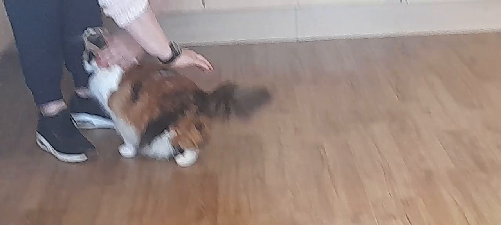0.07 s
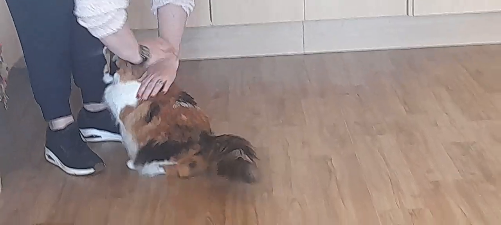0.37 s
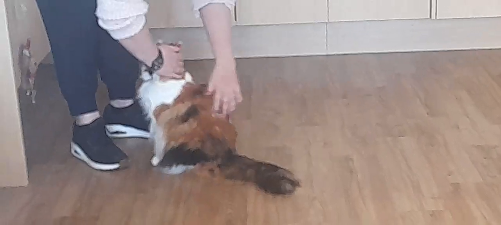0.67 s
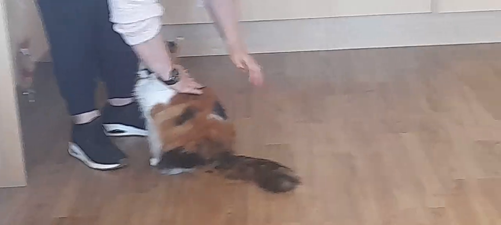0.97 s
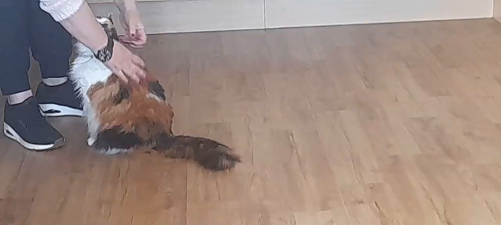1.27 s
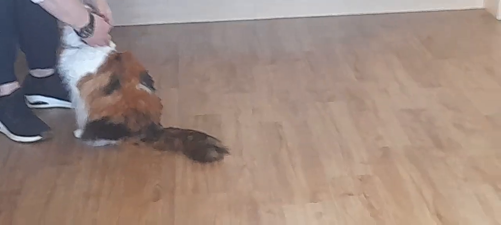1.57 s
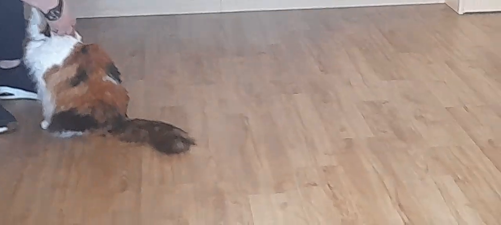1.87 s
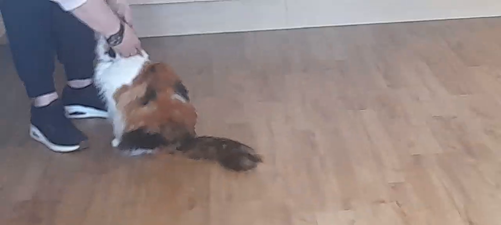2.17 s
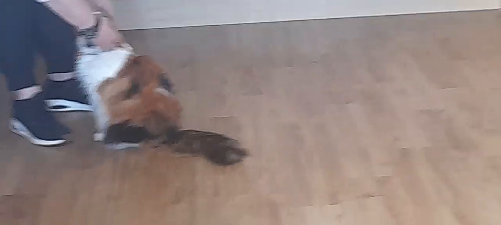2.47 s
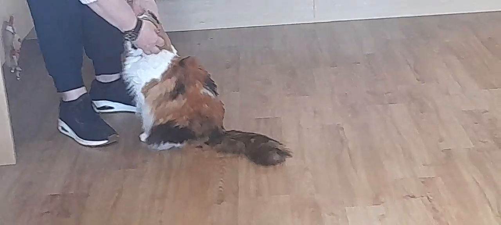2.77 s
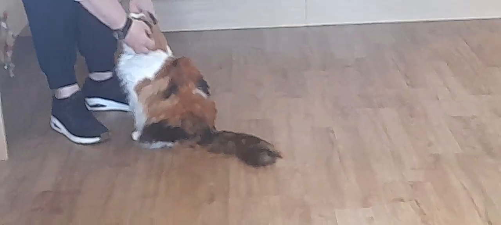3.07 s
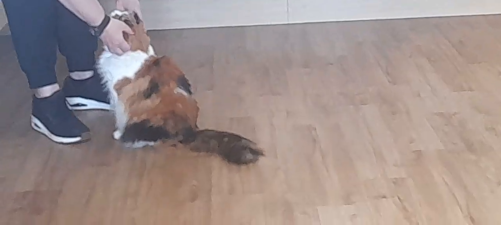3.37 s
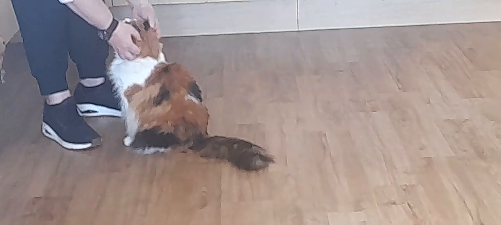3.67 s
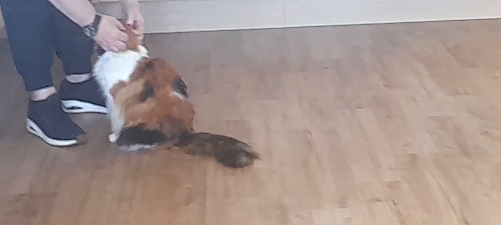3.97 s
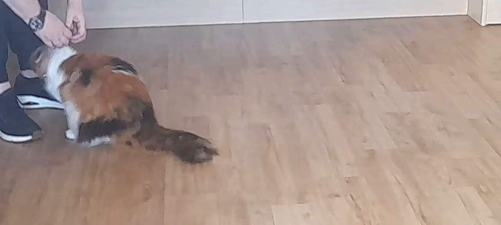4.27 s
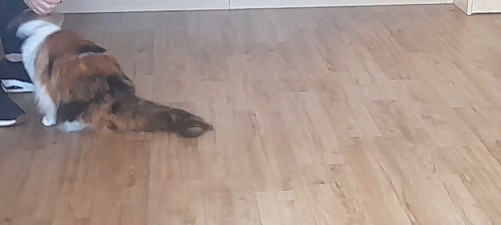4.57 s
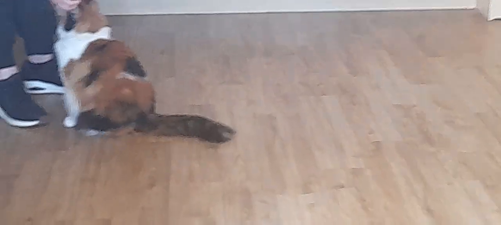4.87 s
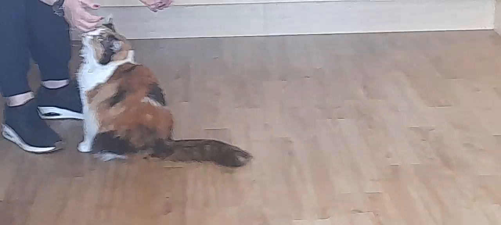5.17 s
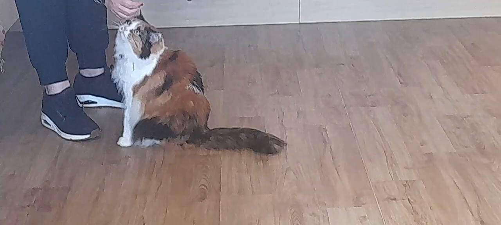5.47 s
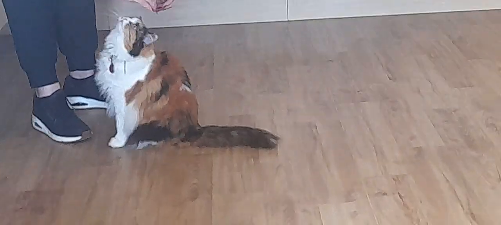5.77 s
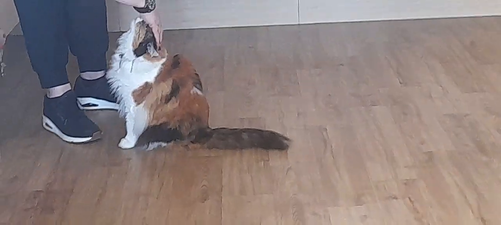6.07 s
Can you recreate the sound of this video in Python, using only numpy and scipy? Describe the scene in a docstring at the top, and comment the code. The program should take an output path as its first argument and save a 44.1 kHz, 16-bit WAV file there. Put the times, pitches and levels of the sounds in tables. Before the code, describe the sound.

A hand-held phone picks up the soft, steady hum and fan noise of a kitchen appliance. After one small tick, a low drone rises and dies away. Past the middle, a cat's collar bell and metal tag give a short, bright jingle and rattle a couple of metres off, with a soft brush of fur and light ticks. The jingle echoes slightly in the bare room, and the appliance carries on alone.

```python
"""An appliance hums and its fan whirs throughout, heard by a hand-held phone in a wooden-floored kitchen.
Near 2 s a dry tick sounds and a low drone swells, to die away by 4 s. Then a cat, being petted about
two metres off, ducks its head once: its fur rustles, the little bell, metal tag and split ring on its
collar jingle and the fittings rattle, with a few more ticks. The bare room rings after the collar,
and from just past 5 s the appliance is left alone."""
import sys
import numpy as np
from scipy import signal
from scipy.fft import rfft, irfft
from scipy.io import wavfile
from scipy.ndimage import uniform_filter1d

SR = 44100
rng = np.random.default_rng(int(sys.argv[2]) if len(sys.argv) > 2 else 0)


def to_wav(s):
    """Save 16-bit WAV."""
    ch = np.atleast_2d(s).T  # columns
    pcm = np.round(np.clip(ch, -1, 1) * 32767)  # PCM
    wavfile.write(sys.argv[1], SR, pcm.astype(np.int16))


N = 270333
TIME = np.arange(N) / SR
FREQ = np.maximum(np.fft.rfftfreq(N, 1 / SR), 1)


def undb(db):
    """Decibels to gain."""
    return 10 ** (np.asarray(db) / 20)


def unit(x):
    """Scale to an rms of 1."""
    return x / np.sqrt(np.mean(x ** 2))


def fader(rows):
    """Gain over time from rows of seconds and dB."""
    return undb(np.interp(TIME, *np.transpose(rows)))


def spectrum(rows, column=1):
    """One column of a table, drawn as a curve over log frequency."""
    rows = np.array(rows)
    return np.interp(np.log(FREQ), np.log(rows[:, 0]), rows[:, column])


def resonance(hz, width):
    """A peak of height 1 over frequency."""
    return 1 / (1 + (2 * (FREQ - hz) / width) ** 2)


def pan(db):
    """Stereo gains for a level difference; positive is to the left."""
    return undb(np.array([[.5], [-.5]]) * db)


def eq(x, gain):
    """Filter by a gain at each frequency."""
    return irfft(rfft(x) * gain, N)


def drift(rate_hz):
    """Smooth random movement, rms 1."""
    hold = int(SR / rate_hz)
    steps = np.repeat(rng.standard_normal(N // hold + 1), hold)
    return unit(uniform_filter1d(uniform_filter1d(steps, hold), hold)[:N])


def stereo_noise(gain, correlation):
    """Coloured noise of rms 1; the lower the correlation, the wider the image."""
    mid, side = rng.standard_normal((2, N))
    mid = eq(mid, gain * np.sqrt(1 + correlation))
    side = eq(side, gain * np.sqrt(1 - correlation))
    return unit(np.array([mid + side, mid - side]))


def add(out, start_s, sound):
    """Mix a sound in at its start time."""
    i = int(start_s * SR)
    out[..., i:i + sound.shape[-1]] += sound[..., :N - i]


def standing_waves(spacing_hz=14):
    """The room lifts some frequencies and hollows out others, less so below 500 Hz."""
    grid_hz = np.arange(0, SR / 2, spacing_hz)
    return np.interp(FREQ, grid_hz, rng.standard_normal(len(grid_hz))) * np.minimum(FREQ / 500, 1)


# Level ride of the fan's air. Each row: time in seconds, relative level in dB.
AIR_RIDE = [(0, -56.5), (1.2, -57), (2.0, -55), (2.7, -56), (3.5, -56), (4.5, -54.5), (5.4, -56),
            (6.13, -55.5)]
# Tone of the rushing air. Each row: frequency in Hz, gain in dB.
AIR_EQ = [(20, -20), (60, -5.5), (140, 1.5), (235, -2.5), (350, 3), (560, -1.5), (850, -10), (1500, -4.5),
          (2100, -9), (2900, -19.5), (5000, -23.5), (6500, -25), (8500, -42.5), (16000, -50)]
# Resonances of the fan housing. Each row: centre in Hz, width in Hz, boost in dB.
HOUSING_PEAKS = [(393, 15, 5.7), (1048, 124, 11.3), (1200, 13, 1.3), (1464, 163, 5.4), (1856, 120, 6.6)]
# Stereo image of the air. Each row: frequency in Hz, left-right correlation.
AIR_IMAGE = [(30, 0.66), (80, 0.59), (300, 0.39), (600, 0.43), (1200, 0.2), (2500, 0.43), (8000, 0.21)]
# Tone of the thin hiss. Each row: frequency in Hz, gain in dB.
HISS_EQ = [(2000, -7), (6000, -5), (8000, -0.5), (10000, 0), (11500, 4.5), (12300, 3), (13000, 8),
           (16000, -2.5)]


def fan(air_db=4.5, hiss_db=-75, ripple_db=2.5, flutter_db=.5):
    """Air rushes through the resonant housing, over a thin even hiss."""
    housing_db = sum(db * resonance(hz, width) for hz, width, db in HOUSING_PEAKS)
    shape_db = spectrum(AIR_EQ) + housing_db + ripple_db * standing_waves()
    air = stereo_noise(undb(shape_db), spectrum(AIR_IMAGE))
    level = fader(AIR_RIDE) * undb(air_db + flutter_db * drift(9))
    hiss = undb(hiss_db) * stereo_noise(undb(spectrum(HISS_EQ)), correlation=.24)
    return level * air * pan(-2.3) + hiss


def tone(hz, waver_db, wander_rad):
    """A hum tone of rms near 1 whose level and phase waver in the room."""
    phase = 2 * np.pi * (hz * TIME + rng.random()) + wander_rad * drift(2.956)
    return np.sqrt(2) * np.sin(phase) * undb(waver_db * drift(7))


def blades(hz=352.9, start_db=-51, rise_db_per_s=1.0746):
    """The fan's blade tone grows steadily as the phone moves."""
    return undb(start_db + rise_db_per_s * TIME) * tone(hz, waver_db=1.05, wander_rad=.22) * pan(-7)


# The drone swells, dies away and creeps faintly back. Each row: time in seconds, level in dB.
DRONE_RIDE = [(0, -58), (1.4, -58), (1.95, -47.5), (2.95, -51), (3.5, -56.5), (3.95, -80), (4.45, -69),
              (5.15, -77), (6.13, -65)]
# Low rumble around the drone. Each row: frequency in Hz, gain in dB.
RUMBLE_EQ = [(20, -19), (45, 2), (80, -6), (150, 5), (250, -22), (600, -62)]


def drone(hz=91.2, mains_hz=100.05, mains_db=-13, rumble_db=-17):
    """An uneven low drone beats against a mains tone that swells with it."""
    rumble = undb(rumble_db) * stereo_noise(undb(spectrum(RUMBLE_EQ)), correlation=1)
    mains = undb(mains_db) * tone(mains_hz, waver_db=3, wander_rad=.5)
    low_tone = tone(hz, waver_db=1.6, wander_rad=.23)
    return fader(DRONE_RIDE) * (low_tone + mains + rumble) * pan(-4)


# Hum of the motor. Each row: frequency in Hz, level in dB.
MOTOR_TONES = [(176.3, -65.5), (528.9, -64), (800.5, -78), (1057.6, -70.5), (1233.9, -73.5), (1385, -68),
               (1867, -74)]
# Mains buzz and lesser tones of the cabinet. Each row: frequency in Hz, level in dB.
MAINS_TONES = [(100, -73), (300.1, -60.5), (321, -69.5), (380.6, -64), (400, -69), (451, -71), (500.3, -77)]


def hum():
    """Shaft harmonics and mains buzz make a bed of wavering tones."""
    tones = sum(undb(db) * tone(hz, waver_db=2.5, wander_rad=.59) for hz, db in MOTOR_TONES + MAINS_TONES)
    return tones * pan(-2.5)


def appliance(lag_samples=4):
    """The appliance stands to the right, so it reaches the left microphone later."""
    left, right = blades() + drone() + hum() + fan()
    return np.array([np.roll(left, lag_samples), right])


def reflections(t60_s=.44, treble_t60_s=.33, crossover_hz=8000):
    """One stereo tail of the bare room, energy 1 a side; the treble dies first."""
    t = TIME[:SR // 2]
    low, high = rng.standard_normal((2, 2, len(t)))
    low = signal.sosfilt(signal.butter(2, crossover_hz, fs=SR, output="sos"), low)
    high = signal.sosfilt(signal.butter(2, crossover_hz, "high", fs=SR, output="sos"), high)
    tail = low * undb(-60 * t / t60_s) + high * undb(-60 * t / treble_t60_s)
    return tail / np.sqrt(np.sum(tail ** 2, axis=1, keepdims=True))


def room(x, direct_db=-6, grain=1024):
    """The cat shadows the direct sound; the collar swings, so each moment meets new reflections."""
    out = undb(direct_db) * x
    window = signal.windows.cosine(grain)
    for i in range(int(SHAKE_START_S * SR) - grain, int(SHAKE_END_S * SR) + grain, grain // 2):
        add(out, i / SR, signal.fftconvolve(x[:, i:i + grain] * window, reflections(), axes=1))
    return out


def snap(hz, width):
    """One push on a well-damped resonance, peak 1."""
    wave = signal.lfilter(*signal.iirpeak(hz, hz / width, fs=SR), signal.unit_impulse(SR // 100))
    return wave / np.abs(wave).max()


# Dry ticks close by. Each row: start in seconds, level in dB, centre in Hz, width in Hz,
# bright edge in dB relative to the knock.
DRY_TICKS = [(1.915, -32.5, 3670, 2400, -1), (3.873, -48, 2500, 1000, -30), (4.801, -44, 2700, 1000, -25),
             (4.8371, -35.5, 2940, 1200, -30)]


def ticks(bounce_s=.0005, bounce_db=-4):
    """Tiny dry snaps, each a dull knock with a bright edge and one quick bounce."""
    out = np.zeros(N)
    for start_s, db, hz, width, edge_db in DRY_TICKS:
        tick = undb(db) * (snap(hz, width) + undb(edge_db) * snap(hz=11000, width=6000))
        add(out, start_s, tick)
        add(out, start_s + bounce_s, undb(bounce_db) * tick)
    return out * pan(-2.2)


# Rustle of fur and paws as the head swings. Each row: time in seconds, level in dB.
FUR_RIDE = [(4.1, -87), (4.38, -53), (4.69, -51.5), (4.85, -72), (5.3, -85)]
# Soft, dark tone of the coat. Each row: frequency in Hz, gain in dB.
FUR_EQ = [(50, -14), (110, -2), (200, 4.5), (500, 1.5), (800, -13.5), (1400, -7), (2300, -10.5),
          (3200, -47), (6000, -46)]


def fur(flutter_db=2):
    """The coat brushes softly against hands and floor."""
    brush = stereo_noise(undb(spectrum(FUR_EQ)), correlation=.7)
    return brush * fader(FUR_RIDE) * undb(flutter_db * drift(35)) * pan(.096)


def struck_metal(modes, times, levels_db, detune, scatter_db=1, attack_s=.0015):
    """Each hit lands on another spot, so the modes answer a little differently every time."""
    out, t = np.zeros((2, N)), TIME[:SR // 4]
    attack = 1 - np.exp(-t / attack_s)  # the ring builds while the pieces bounce on each other
    for start_s, hit_db in zip(times, levels_db):
        for hz, db, t60_s, pan_db in modes:
            size, shift, phase = rng.standard_normal(3)
            wave = np.sin(2 * np.pi * (hz * (1 + detune * shift) * t + phase))
            envelope = undb(hit_db + db + scatter_db * size) * attack * undb(-60 * t / t60_s)
            add(out, start_s, pan(pan_db) * envelope * wave)
    return out


# How hard the collar shakes as the head ducks and lifts. Each row: time in seconds, relative level in dB.
SHAKE_RIDE = [(4.13, -84), (4.27, -55), (4.46, -51.5), (4.5, -43.5), (4.56, -50), (4.69, -48.5),
              (4.77, -67), (4.93, -67), (5.1, -90)]
SHAKE_START_S, SHAKE_END_S = SHAKE_RIDE[0][0], SHAKE_RIDE[-1][0]


def jingle(modes, hits, light_db, detune, light_hits=45, spread_db=2):
    """A metal piece rings at its main hits and at random light ones whose level follows the shaking."""
    slots = np.arange(light_hits) + rng.random(light_hits)
    light_times = np.interp(slots, [0, light_hits], [SHAKE_START_S, SHAKE_END_S])
    shake_db = np.interp(light_times, *np.transpose(SHAKE_RIDE))
    light_levels = shake_db + light_db + spread_db * rng.standard_normal(light_hits)
    main_times, main_levels, _ = np.transpose(hits)
    return struck_metal(modes, np.r_[main_times, light_times], np.r_[main_levels, light_levels], detune)


# Ringing modes of the bell, the tag and the split ring.
# Each row: frequency in Hz, relative level in dB, seconds to fall 60 dB, pan in dB (left minus right).
BELL_MODES = [(8130, -7, .03, 12), (8315, -1, .045, 11), (8370, -3, .045, 10), (8500, -7, .03, 11),
              (9100, -11, .04, 6)]
TAG_MODES = [(4759, -3, .03, -4), (5600, -8, .02, -7), (5850, -8, .02, -7), (14149, 0, .04, -2),
             (15680, -14, .04, -1)]
SPLIT_RING_MODES = [(9650, -2, .05, -1), (9695, -2, .05, -2), (15678, -6, .05, -1)]
# Main hits on each piece. Each row: start in seconds, relative ring and click levels in dB.
BELL_HITS = [(4.173, -56, -64), (4.203, -47, -49), (4.261, -43, -44), (4.284, -42, -59), (4.310, -33, -42),
             (4.35, -34, -41), (4.381, -30, -46), (4.597, -28.5, -32.5), (4.675, -38, -52),
             (4.805, -45, -46), (4.928, -46, -60), (4.995, -54, -73)]
TAG_HITS = [(4.258, -47, -54), (4.375, -27.5, -38), (4.395, -37, -50), (4.534, -33.5, -41),
            (4.656, -44, -44), (4.718, -39, -54), (4.905, -48, -48.5)]
SPLIT_RING_HITS = [(4.476, -46, -37.5), (4.514, -32, -31.5), (4.538, -34, -43), (4.586, -43, -35),
                   (4.718, -42, -54)]


def collar_jingle():
    """The pellet strikes the bell, the tag slaps the collar and the split ring snaps taut."""
    bell = jingle(BELL_MODES, BELL_HITS, light_db=3, detune=.003)
    tag = jingle(TAG_MODES, TAG_HITS, light_db=-3, detune=.001)
    split_ring = jingle(SPLIT_RING_MODES, SPLIT_RING_HITS, light_db=-4, detune=.001)
    return bell + tag + split_ring


def clicks(per_s, spread_db=4):
    """A random train of tiny contacts of uneven size, rms 1."""
    size = undb(spread_db * np.clip(rng.standard_normal(N), -1, 1))
    return unit((rng.random(N) < per_s / SR) * rng.choice([-1, 1], N) * size)


# Bright tone of small metal contacts. Each row: frequency in Hz, gain in dB, pan in dB.
CONTACT_EQ = [(1510, -14, -26), (2400, -3.5, -2), (3500, -6, 5), (5000, 1.5, -2), (5730, 4, -9),
              (7500, -2.5, -0.5), (8200, 3, 2), (9600, 1, 7), (10700, -3, -2), (12300, 1, 1),
              (14300, -2, 3), (16000, -1, -6)]


def collar_rattle(rattle_db=2, chatter_decay_s=.0093, sympathy_db=1.5):
    """The metal chatters for a moment at each main hit, and the fittings rattle in between."""
    chatter = np.zeros(N)
    for start_s, _, click_db in BELL_HITS + TAG_HITS + SPLIT_RING_HITS:
        add(chatter, start_s, undb(click_db) * np.exp(-TIME[:SR // 10] / chatter_decay_s))
    shaking = (TIME > SHAKE_START_S) & (TIME < SHAKE_END_S)
    rattle = undb(rattle_db) * fader(SHAKE_RIDE) * shaking
    contacts = chatter * clicks(per_s=8000) + rattle * clicks(per_s=1500)
    # every contact also stirs the modes of the tag and split ring a little
    stirred = sum(undb(db) * resonance(hz, width=220) for hz, db, _, _ in TAG_MODES + SPLIT_RING_MODES)
    tint = undb(spectrum(CONTACT_EQ) + sympathy_db * np.minimum(stirred, 1))
    return eq(contacts, tint * pan(spectrum(CONTACT_EQ, column=2)))


def scene():
    """The collar rings in the live room; fur, ticks and the appliance are mixed in without reverb."""
    return room(collar_jingle() + collar_rattle()) + fur() + ticks() + appliance()


def record(dry, top_hz=15800):
    """The phone cuts the highest treble."""
    return signal.fftconvolve(dry, signal.firwin(801, top_hz, fs=SR)[None], "same", axes=1)


dry = scene()
out = record(dry)
to_wav(out)
```